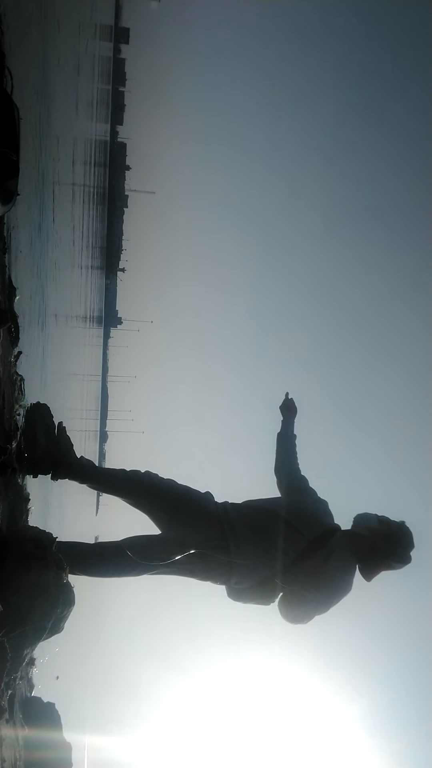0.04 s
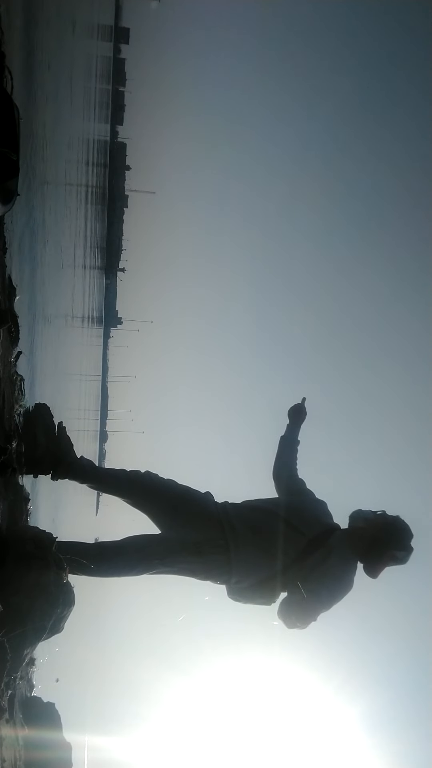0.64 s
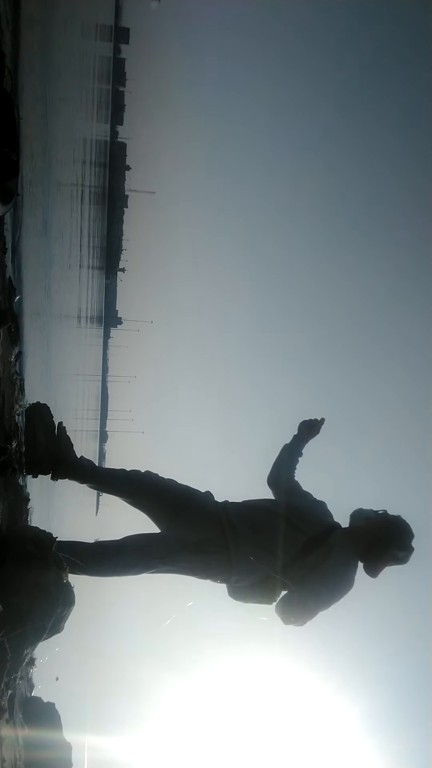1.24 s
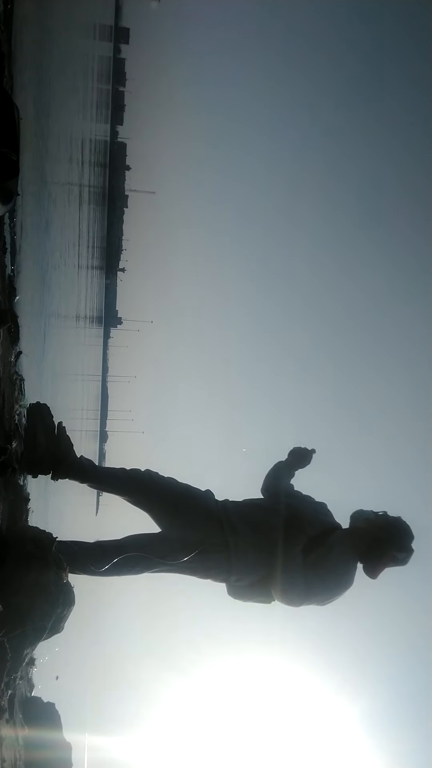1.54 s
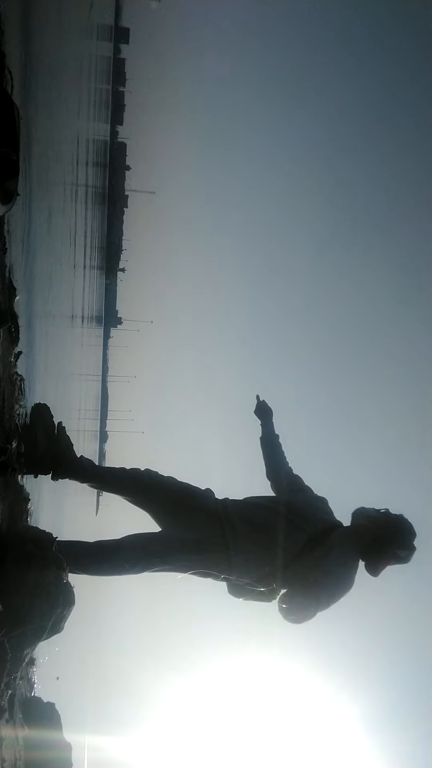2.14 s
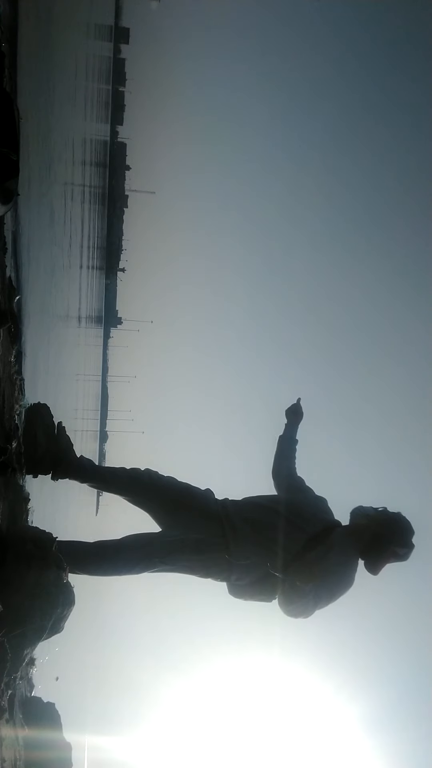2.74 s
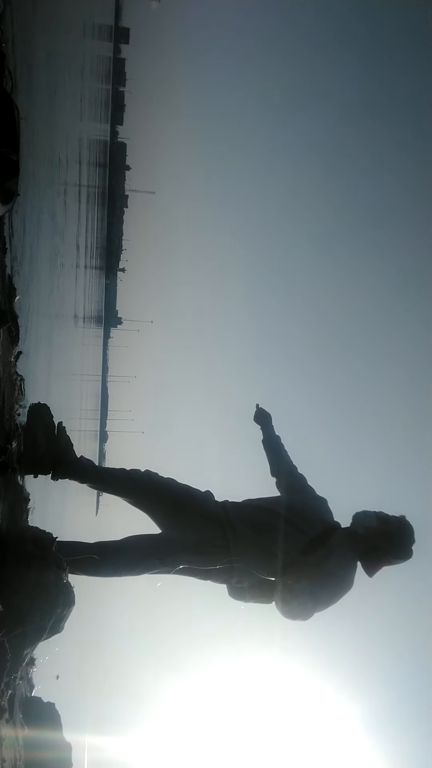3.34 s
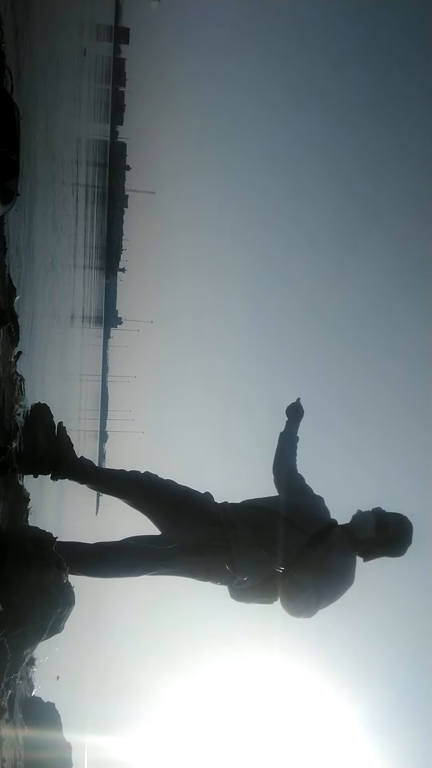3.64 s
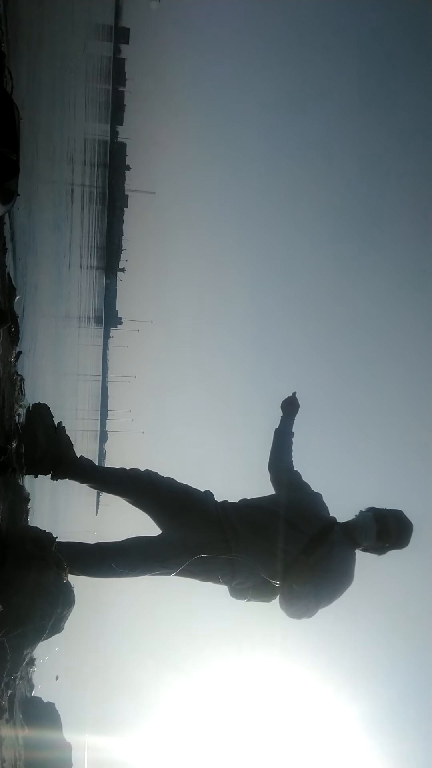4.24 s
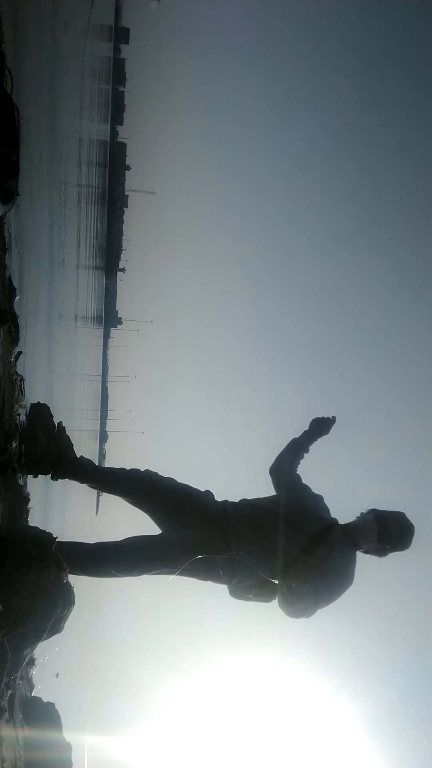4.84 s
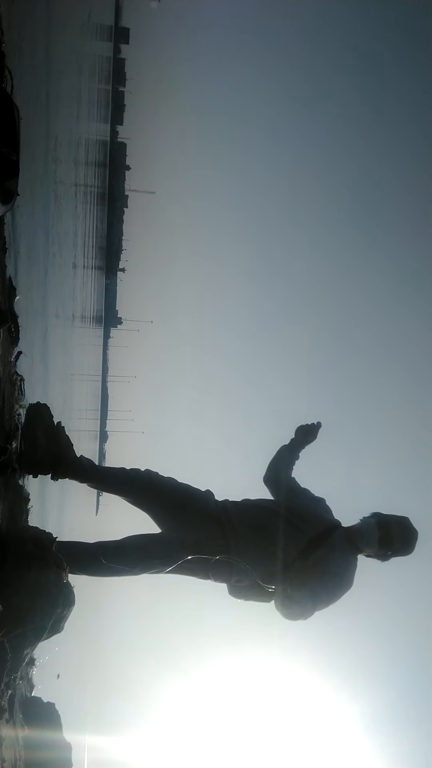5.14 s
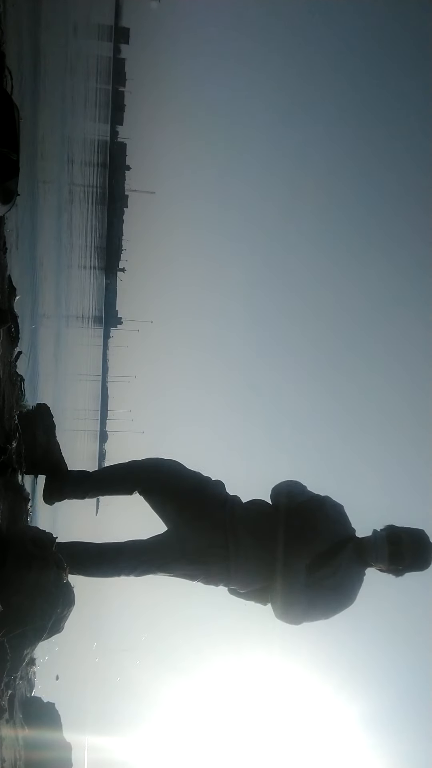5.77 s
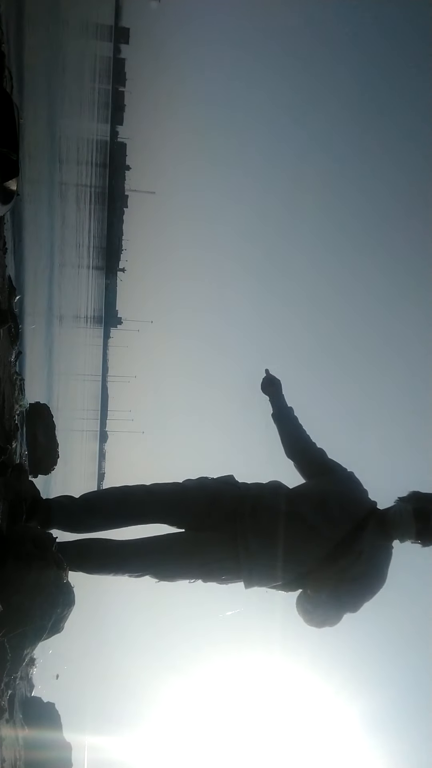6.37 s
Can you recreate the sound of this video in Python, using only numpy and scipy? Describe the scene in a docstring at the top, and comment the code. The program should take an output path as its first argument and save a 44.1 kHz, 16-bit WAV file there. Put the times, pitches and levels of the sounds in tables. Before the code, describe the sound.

On a calm rocky shore, a steady low rumble of wind and distant harbour engines runs throughout. A far gull calls twice as a small stone clacks and a wavelet laps with tiny plops. More wavelets fizz softly between the rocks. Near the end a small bird peeps faintly, a shoe scrapes on gritty rock, the gull calls again and a last scuff follows. The microphone hears these small sounds slightly to the right.

```python
"""A calm shore across from a harbour: distant engines rumble and slowly gather speed throughout.
A far gull calls twice while a stone clacks and wavelets lap, fizz and tick between the rocks.
More wavelets wash in at about 3.5 s and 5 s; a small bird peeps, and someone shifts on the stones
with a gritty scrape. The gull calls a third time, and a last scuff follows.
Two spaced microphone ports hear the far rumble alike and the treble apart."""
import sys
import numpy as np
from scipy import signal
from scipy.fft import rfft, irfft, next_fast_len
from scipy.io import wavfile
from scipy.ndimage import map_coordinates

SR = 44100
rng = np.random.default_rng(int(sys.argv[2]) if len(sys.argv) > 2 else 0)


def int16_out(signal):
    """Quantize to a 16-bit WAV file."""
    q = np.round(np.clip(np.atleast_2d(signal).T, -1, 1) * 32767)
    wavfile.write(sys.argv[1], SR, q.astype(np.int16))


N = 282372

# tone colour of fizzing water: (frequency [Hz], relative level [dB])
FIZZ_COLOUR = [(500, -20), (800, 2), (1150, 7.5), (1700, -0.5), (2450, -0.5), (3200, -0.5), (5000, -6.5),
               (7500, 1)]


def amp(db):
    """Decibels to gain."""
    return 10 ** (np.asarray(db) / 20)


def unit(x):
    """Scale to rms 1."""
    return x / np.sqrt(np.mean(x ** 2) + 1e-20)


def along(points, hz):
    """Read (frequency, value) points on a log frequency axis."""
    knots_hz, values = np.transpose(points)
    return np.interp(np.log(hz + 1), np.log(knots_hz + 1), values)


def wobble(rate):
    """A smooth random curve, rate knots a second."""
    knots = rng.standard_normal(int(N * rate / SR) + 4)
    return map_coordinates(knots, [np.arange(N) * rate / SR])


def swell(start, crest, end, range_db):
    """Gain of 1 at the crest, sloping evenly in dB: range_db lower at start and end, fading on beyond."""
    t = np.arange(N) / SR
    before = (crest - t) / max(crest - start, 1e-3)
    after = (t - crest) / max(end - crest, 1e-3)
    return amp(-range_db * np.maximum(before, after))


def filtered(x, response):
    """Shape x with a gain given as a function of frequency."""
    size = next_fast_len(N + SR // 2)
    return irfft(rfft(x, size) * response(np.fft.rfftfreq(size, 1 / SR)), size)[..., :N]


def add(track, s, sound):
    """Mix a sound into a track at time s."""
    part = track[max(round(s * SR), 0):][:len(sound)]
    part += sound[:len(part)]


def strewn(density, count):
    """Events that come thickest where the density is highest: (time [s], chance [-1 to 1])."""
    share = np.cumsum(density) / np.sum(density)
    return [(np.searchsorted(share, (k + when) / count) / SR, 2 * chance - 1)
            for k, (when, chance) in enumerate(rng.random((count, 2)))]


def at_ports(x, lag_ms):
    """Direct sound reaches the right port lag_ms before the left."""
    return filtered(x, lambda hz: np.exp(np.outer([-1j, 1j], np.pi * hz * lag_ms / 1000)))


def pan(right_db):
    """Left and right gains, the right louder by right_db."""
    return amp([[-right_db / 2], [right_db / 2]])


def placed(x, right_db, lag_ms, echo_db, t60):
    """A source is louder at the right port; the shore scatters a short tail."""
    t = np.arange(SR // 2) / SR
    tail = rng.standard_normal((2, len(t))) * np.exp(-np.log(1000) * t / t60)
    echo = signal.fftconvolve(x[None], tail / np.linalg.norm(tail[0]), axes=1)[:, :N]
    return (at_ports(x, lag_ms) + amp(echo_db) * echo) * pan(right_db)


def diffuse(colour):
    """Noise of rms 1 from all around: the longest waves reach both ports alike."""
    # likeness of the two ports: (frequency [Hz], correlation [-1 to 1])
    likeness = [(60, 0.95), (140, 0.96), (220, 0.86), (350, 0.67), (540, -0.032), (840, -0.46),
                (1300, -0.24), (2000, .12), (3100, -0.059)]
    # stereo balance: (frequency [Hz], left minus right [dB])
    lean = [(100, -1), (300, 1), (600, 0.5), (1100, -2), (2000, -4), (3500, 3), (7000, -1)]

    def mid_side_gains(hz):
        width = np.arccos(np.clip(along(likeness, hz), -1, 1)) / 2
        return amp(along(colour, hz)) * [np.cos(width), np.sin(width)]

    mid, side = filtered(rng.standard_normal((2, N)), mid_side_gains)
    ports = np.array([mid + side, mid - side])
    return unit(filtered(ports, lambda hz: amp(np.outer([.5, -.5], along(lean, hz)))))


def grains(colour, rate, spread_db):
    """Random tiny impacts of uneven size, about rate a second, rms 1."""
    sizes = amp(spread_db * np.clip(rng.standard_normal(N), -2, 2)) * rng.choice([-1, 1], N)
    impacts = sizes * (rng.random(N) < rate / SR)
    return unit(filtered(impacts, lambda hz: amp(along(colour, hz))))


def patter(colour, rate, spread_db, right_db, scatter_db, lag_ms=0):
    """A patch of grains: some reach both ports directly, others are scattered to one port only."""
    common, left, right = [grains(colour, rate, spread_db) for _ in range(3)]
    return (at_ports(common, lag_ms) + amp(scatter_db) * np.array([left, right])) * pan(right_db)


def background():
    """A bed of low harbour and wind rumble under a soft wash of open air."""
    # slow drift of the rumble: (time [s], relative level [dB])
    drift = [(0.0, -52.5), (0.86, -55), (1.07, -52), (5.99, -53), (6.4, -56.5)]
    # bass-heavy colour of the rumble: (frequency [Hz], relative level [dB])
    rumble_colour = [(12, -7), (25, -3.5), (40, -1.5), (65, 3), (85, 0.2), (140, -2.5), (190, -4),
                     (270, -8), (350, -12), (470, -20), (700, -30), (1500, -71)]
    # midrange colour of the air: (frequency [Hz], relative level [dB])
    air_colour = [(150, -22), (450, 2), (700, 3.5), (1000, 2), (1500, -7.5), (2100, -13), (2800, -20.5),
                  (4000, -23.5), (7600, -25)]
    drift_db = np.interp(np.arange(N) / SR, *np.transpose(drift))
    rumble = amp(drift_db + 3.5 + 1.08 * wobble(7.7)) * diffuse(rumble_colour)
    air = amp(-64 + 1.1 * wobble(2.362)) * diffuse(air_colour)
    return rumble + air


def drone(hz, flutter):
    """A tone of rms 1 whose level and phase waver on the way over the water."""
    phase = 2 * np.pi * np.cumsum(hz) / SR
    return unit((1 + flutter * wobble(7)) * np.sin(phase) + flutter * wobble(7) * np.cos(phase))


def engines():
    """Two far drones climb slowly in pitch; a geared whine follows the deeper one."""
    t = np.arange(N) / SR
    deep_hz, second_hz = 50.5 + 2.63 * t, 156.44 + 4.75 * t
    gear_ratio, loudest_s, fade_db_per_s = 4.37, 2.8, 0.5
    deep = amp(-51 - fade_db_per_s * np.abs(t - loudest_s)) * drone(deep_hz, flutter=0.43)
    whine = amp(-66) * drone(gear_ratio * deep_hz, flutter=0.46)
    second = amp(-60.5) * drone(second_hz, flutter=0.51)
    return (deep + whine + second) * pan(right_db=0.8)


def hums():
    """Passing low tones swell out of the rumble and fade."""
    # low hums: (middle [s], length [s], pitch [Hz], level [dB])
    low_tones = [(0.801, 1.26, 60.2, -62.5), (1.143, 0.31, 100.5, -43), (4.209, 0.1002, 97.5, -45)]
    out = np.zeros(N)
    for middle, length, hz, db in low_tones:
        t = np.arange(int(length * SR)) / SR
        envelope = amp(db) * signal.windows.tukey(len(t), .6)
        add(out, middle - length / 2, envelope * np.sqrt(2) * np.sin(2 * np.pi * hz * t))
    return out


def gull():
    """Each hoarse cry starts low and soft, breaks up to a shallow arch and fades."""
    # cries: (start [s], length [s], top pitch [Hz], relative level [dB], pitch arch [ratio],
    # fade over the cry [dB], second voice against the first [dB])
    cries = [(1.621, .255, 2050, -59, 0.132, 13.5, -15), (2.246, 0.24, 2023, -61.5, 0.11, 11, -16),
             (5.873, .25, 2048, -65.5, .29, 5.5, -4)]
    lead_s, break_s, lead_drop, lead_db = .042, 0.0066, 0.11, -9  # the low opening of a cry
    hoarse_rad = 0.58  # phase roughness
    out = np.zeros(N)
    for start, length, top_hz, db, arch, fade_db, second_db in cries:
        t = np.arange(int(length * SR)) / SR
        progress = t / length
        lead = .5 - .5 * np.tanh((t - lead_s) / break_s)
        hz = top_hz * (1 - lead_drop * lead - arch * (progress - .55) ** 2)
        phase = 2 * np.pi * np.cumsum(hz) / SR
        first, second, undertone = [np.sin(ratio * phase + hoarse_rad * wobble(200)[:len(t)])
                                    for ratio in (1, 0.96, 3 / 4)]
        edges = np.minimum(t / 0.013, 1) * np.minimum((length - t) / 0.018, 1)
        envelope = amp(db - fade_db * progress + lead_db * lead) * edges
        add(out, start, envelope * (first + amp(second_db) * second + amp(-18.5) * undertone))
    return out


def peeps():
    """A small bird's short thin notes, each a slightly unsteady arch of pitch."""
    # notes: (start [s], length [s], top pitch [Hz], relative level [dB], pitch arch [ratio])
    notes = [(5.157, .038, 4650, -73.5, .14), (5.246, 0.022, 4820, -78, .1),
             (5.37, 0.029, 4600, -72.5, .05)]
    out = np.zeros(N)
    for start, length, top_hz, db, arch in notes:
        progress = np.arange(int(length * SR)) / (length * SR)
        hz = top_hz * (1 - arch * (progress - .4) ** 2)
        phase = 2 * np.pi * np.cumsum(hz) / SR + .35 * wobble(400)[:len(hz)]
        add(out, start, amp(db) * signal.windows.tukey(len(hz), .6) * np.sin(phase))
    return out


def birds():
    """A gull far off to the right, echoing over the water, and a small bird nearer by."""
    far = placed(gull(), right_db=9, lag_ms=0.71, echo_db=-7.5, t60=.45)
    near = placed(peeps(), right_db=11, lag_ms=0, echo_db=-14, t60=.15)
    return amp(-3) * (far + near)


def clack():
    """One stone strikes another and chatters; each contact rings a few short modes."""
    # contacts: (time [s], relative level [dB])
    contacts = [(1.7756, -39.5), (1.77603, -51)]
    # ring of the stone: (frequency [Hz], relative level [dB], time to fall 60 dB [s])
    modes = [(3300, -10, 0.0086), (4900, -11, 0.0069), (6100, -7, 0.0056), (7300, 2.5, 0.0024)]
    lowest_hz = 3000  # a small stone radiates little below this
    out, t = np.zeros(N), np.arange(SR // 50) / SR
    ring = sum(amp(db - 60 * t / t60) * np.sin(2 * np.pi * hz * t) for hz, db, t60 in modes)
    ring = signal.lfilter(*signal.butter(4, lowest_hz, "highpass", fs=SR), ring)
    for s, db in contacts:
        add(out, s, amp(db + 4) * ring)
    return placed(out, right_db=6, lag_ms=.41, echo_db=-17, t60=.03)


def scrape():
    """A sole drags over gritty rock, scuffs dully under weight and slips off with a bright rasp."""
    # strokes of the sole: (start [s], peak time [s], release [s], relative level [dB])
    pushes = [(5.35, 5.485, 0.17, -67.5), (5.43, 5.54, 0.048, -72), (5.54, 5.645, 0.063, -67),
              (6.294, 6.365, .25, -69)]
    slips = [(5.585, 5.638, .035, -67.5), (5.638, 5.673, 0.02, -59), (5.68, 5.689, 0.006, -57)]
    scuffs = [(5.61, 5.648, .025, -67.5), (6.305, 6.332, 0.099, -69.5)]
    # grain colour of each kind of stroke: (frequency [Hz], relative level [dB])
    grit_colour = [(700, -23), (1020, 8), (1190, -1), (1390, 11), (1650, -8.5), (2250, 0), (2900, -9),
                   (3900, 3), (4700, -5), (6100, -1.5), (7700, -4.5)]
    rasp_colour = [(900, -28), (1700, -8), (2240, -5), (2600, -17), (3800, -1), (4800, -2.5), (5400, -3),
                   (6200, -2), (7700, -13.5)]
    scuff_colour = [(350, -19), (650, 7), (1000, 7), (1400, -6), (1800, -22), (3000, -45)]

    def effort(strokes):
        return sum(amp(db) * swell(start, peak, peak + release, range_db=20.5)
                   for start, peak, release, db in strokes)

    grit = patter(grit_colour, rate=16000, spread_db=3.5, right_db=3, scatter_db=-1.5)
    rasp = patter(rasp_colour, rate=7900, spread_db=3, right_db=4, scatter_db=-6.5)
    scuff = patter(scuff_colour, rate=1500, spread_db=3, right_db=5, scatter_db=-4)
    roughness = amp(2 + 1.7 * wobble(130))
    return roughness * (effort(pushes) * grit + effort(slips) * rasp + effort(scuffs) * scuff)


def faint_ticks(density, db, count):
    """Rows for ticks() of uneven size: the bigger the tick, the lower its pitch."""
    return [(s, db + 1.5 * size, 6500 * 2 ** (-.3 * size), 0.38) for s, size in strewn(density, count)]


def ticks():
    """Small hard contacts: a dry snap and a trace of crumbling, each at its own pitch."""
    # the loudest stone, grit and spray: (time [s], relative peak [dB], pitch [Hz], width [octaves])
    accents = [(.67, -67.5, 3600, 0.88), (1.542, -61, 3600, 0.6), (1.584, -59.5, 6270, 0.22),
               (1.596, -62, 5500, 0.81), (1.647, -59, 6500, .5), (1.82, -66.5, 7300, .2),
               (1.831, -57, 5500, 1.2), (1.8355, -62, 5800, 0.99), (1.855, -65, 7200, .2),
               (1.879, -60.5, 7300, .15), (1.9602, -52.5, 7140, 0.38), (1.9735, -48, 6550, 0.8),
               (2.042, -67, 7300, 0.23), (2.977, -65.5, 7260, 0.15), (3.041, -61, 6500, .7),
               (3.048, -53, 5200, 1.2), (3.057, -51.5, 5500, 1.7), (3.1398, -59, 7100, .21),
               (3.316, -61, 6700, .5), (3.3405, -60, 6700, 0.37), (3.3615, -57, 5600, .8),
               (3.365, -61, 6600, .3), (3.385, -60, 6500, .4), (3.39, -59, 7200, .3),
               (3.397, -55.5, 4700, .54), (3.405, -61, 5500, .6), (3.426, -61, 5800, .45),
               (3.483, -61, 5500, 1.1), (3.504, -63, 5500, .3), (3.536, -60, 5000, 1),
               (3.5776, -53.5, 6700, .48), (4.217, -69, 5300, 0.41), (4.801, -66, 6500, .5),
               (4.836, -58, 6840, .46), (4.844, -55, 6700, 0.76), (4.849, -64, 7000, 0.43),
               (4.903, -65, 6800, .35), (4.998, -73, 5500, .7), (5.067, -63, 5800, .9),
               (5.071, -64.5, 5900, .7), (5.131, -70, 7300, .25), (5.137, -70, 5040, .5),
               (5.4041, -48.5, 4170, 0.72), (5.885, -61.5, 6600, 0.3), (6.056, -65, 5500, 0.94),
               (6.113, -63, 5030, 1.2)]
    crumble_s, crumble_db = 0.001, -10
    spray = faint_ticks(water_flow() ** 3, db=-67.5, count=45)
    strays = faint_ticks(np.ones(N), db=-69, count=6)
    out, t = np.zeros(N), np.arange(SR // 40) / SR
    for s, db, hz, octaves in accents + spray + strays:
        contact = (t == 0) + amp(crumble_db) * rng.standard_normal(len(t)) * np.exp(-t / crumble_s)
        band = np.minimum(hz * 2 ** (abs(octaves) * np.array([-.5, .5])), SR / 2 - 1)
        snap = signal.lfilter(*signal.butter(2, band, "bandpass", fs=SR), contact)
        add(out, s, amp(db + 1.5) * snap / np.abs(snap).max())
    return placed(out, right_db=6, lag_ms=.41, echo_db=-15, t60=.03)


def water_flow():
    """Each wavelet swells and ebbs; a faint trickle goes on between them."""
    # wavelets reaching the rocks: (crest [s], rise [s], ebb [s], relative level [dB])
    laps = [(1.835, .034, .1, -71.5), (1.96, .15, 0.35, -76.5), (3.325, .03, .15, -76),
            (3.43, .12, .27, -72), (3.575, .16, .24, -73), (4.97, .15, .12, -81), (5.15, .15, .4, -78)]
    trickle = amp(-87)
    return trickle + sum(amp(db) * swell(crest - rise, crest, crest + ebb, range_db=19)
                         for crest, rise, ebb, db in laps)


def bubble(hz, t60, glide):
    """A bubble rings and glides in pitch as it nears the surface or its cavity opens."""
    t = np.arange(int(t60 * SR)) / SR
    envelope = np.exp(-np.log(1000) * t / t60) * (1 - np.exp(-t / 0.00052))
    return envelope * np.sin(2 * np.pi * hz * t * (1 + glide * t / t60))


def lesser_bubbles(flow, count):
    """Rows for water() of soft bubbles shed near the crests of the wavelets."""
    middle_hz, spread_octaves, db, cycles, glide = 2400, 0.41, -67, 59, 0.12
    pitches = [(s, middle_hz * 2 ** (spread_octaves * chance)) for s, chance in strewn(flow ** 4, count)]
    return [(s, hz, db, cycles / hz, glide) for s, hz in pitches]


def froth(count, cycles, range_db):
    """Countless tiny bubbles, each with its own pitch and level, rms 1."""
    out = np.zeros(N)
    for when, pitch, softness in rng.random((count, 3)):
        hz = 800 * 10 ** pitch
        add(out, when * N / SR, hz * amp(-range_db * softness) * bubble(hz, cycles / hz, glide=0.09))
    return unit(filtered(out, lambda hz: amp(along(FIZZ_COLOUR, hz))))


def water():
    """Each wavelet fizzes on the rocks and traps bubbles."""
    # the clearest bubbles and drips: (time [s], pitch [Hz], relative level [dB],
    # time to fall 60 dB [s], glide [half the fractional pitch change over the ring])
    clear_bubbles = [(.193, 6100, -66, .0085, 0.17), (.219, 5560, -66, .012, 0.075),
                     (.233, 2440, -65, 0.022, .16), (.745, 5000, -65, .014, .1),
                     (1.831, 1580, -62, 0.054, -.18), (1.832, 3000, -56, 0.012, -0.27),
                     (1.842, 4200, -74, 0.034, -.25), (1.885, 1850, -66.5, 0.036, 0.0093),
                     (1.935, 2730, -68, 0.04, -0.12), (1.948, 2150, -59, 0.032, -.1),
                     (2.003, 1630, -60, .05, .16), (2.003, 2340, -66, 0.035, 0.18),
                     (2.195, 1640, -49, 0.017, -0.37), (2.219, 5800, -66, 0.012, 0.12),
                     (2.545, 2360, -61.5, .013, .16), (3.013, 4470, -64, .013, 0.12),
                     (3.315, 2340, -64, .014, .16), (3.339, 2290, -58.5, .018, .16),
                     (3.41, 2100, -64, 0.031, .16), (3.432, 2590, -62, .05, .08),
                     (3.539, 2530, -64, 0.044, 0.13), (3.484, 2220, -63, .035, -.1),
                     (3.595, 2300, -63, 0.039, 0.14), (3.627, 2600, -67, 0.029, .1),
                     (3.567, 1065, -52, .05, .1), (3.651, 3710, -59.5, 0.019, .08),
                     (3.66, 1580, -54.5, 0.023, .25), (3.67, 2055, -59.5, 0.061, .2),
                     (3.68, 5800, -65, .018, 0.033), (3.782, 2170, -59.5, .01, 0.21),
                     (3.805, 3730, -66, 0.017, 0.061), (4.246, 3160, -63, .015, 0.13),
                     (4.965, 2400, -53, 0.011, 0.14), (4.965, 3670, -61, 0.0091, 0.13),
                     (4.972, 4500, -58, 0.0069, .1), (5.018, 5700, -71, .01, 0.14),
                     (5.105, 1260, -55, 0.031, 0.27), (5.144, 1710, -60, .042, 0.08),
                     (5.157, 2050, -65, .028, 0.14), (6.105, 2250, -73, 0.032, -.06)]
    flow, plops = water_flow(), np.zeros(N)
    for s, hz, db, t60, glide in clear_bubbles + lesser_bubbles(flow, count=7):
        add(plops, s, amp(db) * bubble(hz, t60, glide))
    fizz = patter(FIZZ_COLOUR, rate=3400, spread_db=6.5, right_db=2, scatter_db=5.5, lag_ms=.47)
    crackle = amp(0.7 + 2.7 * wobble(90)) * froth(count=14000, cycles=10, range_db=35)
    bubbling = placed(flow * crackle + plops, right_db=5.5, lag_ms=.47, echo_db=-4.5, t60=0.071)
    return amp(-8.5) * flow * fizz + bubbling


def scene():
    """Everything heard from the rocks."""
    return background() + engines() + hums() + birds() + water() + ticks() + clack() + scrape()


def record(dry):
    """A steep low-pass takes off the highest treble."""
    cutoff_hz = 7850
    return filtered(dry, lambda hz: 1 / np.sqrt(1 + (hz / cutoff_hz) ** 160))


dry = scene()
out = record(dry)
int16_out(out)
```